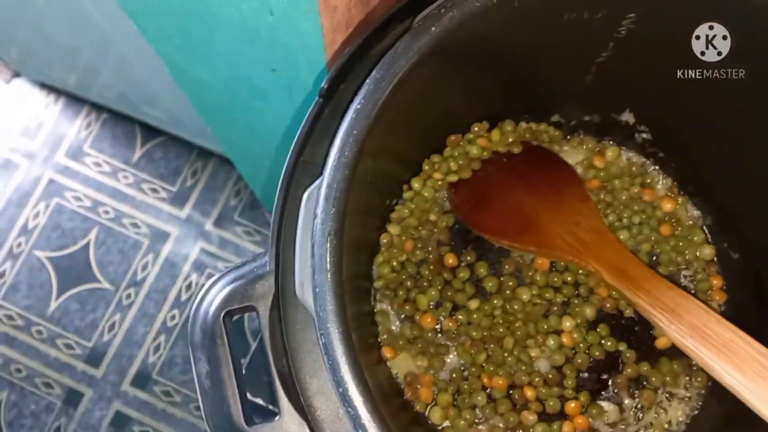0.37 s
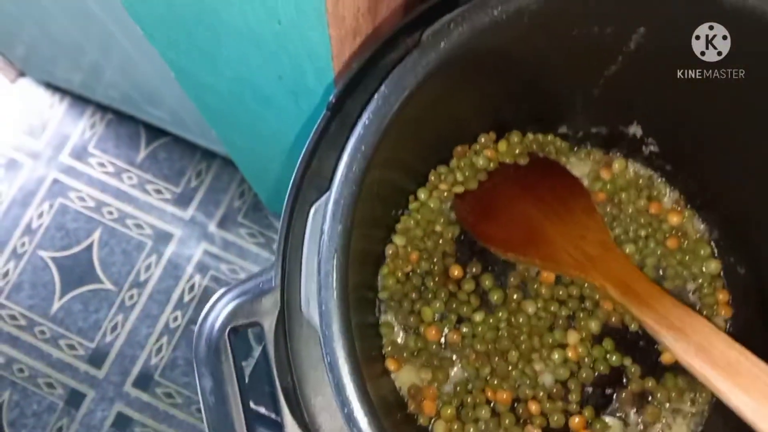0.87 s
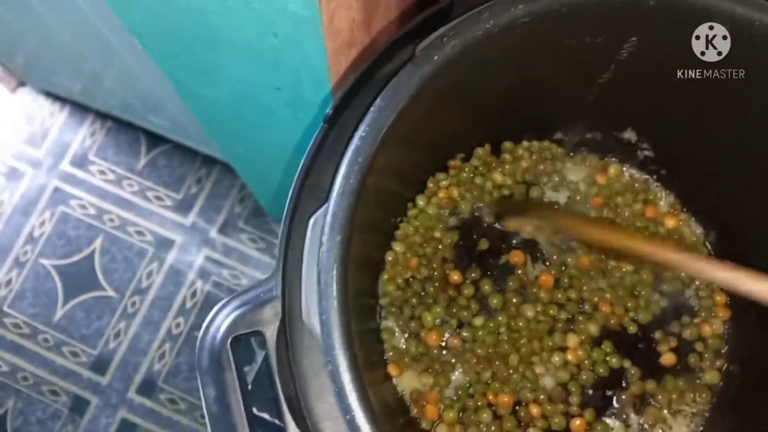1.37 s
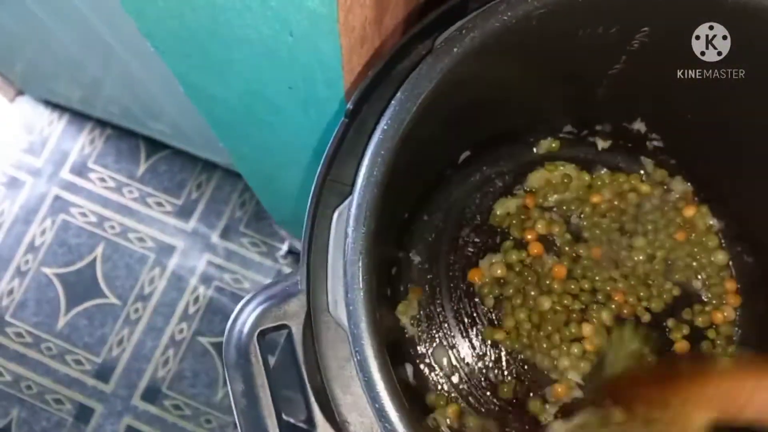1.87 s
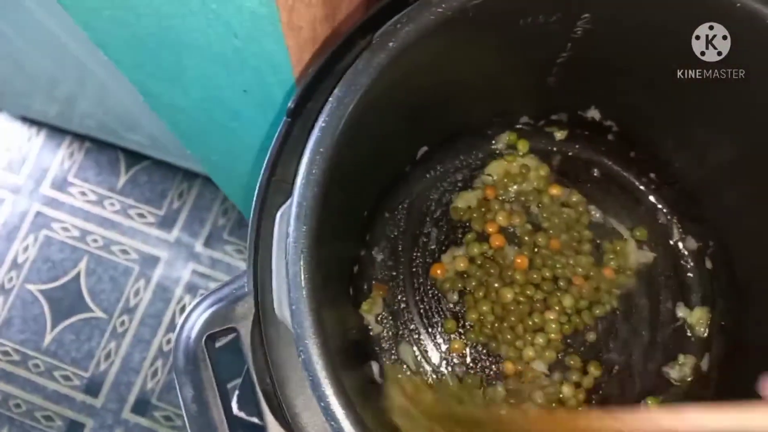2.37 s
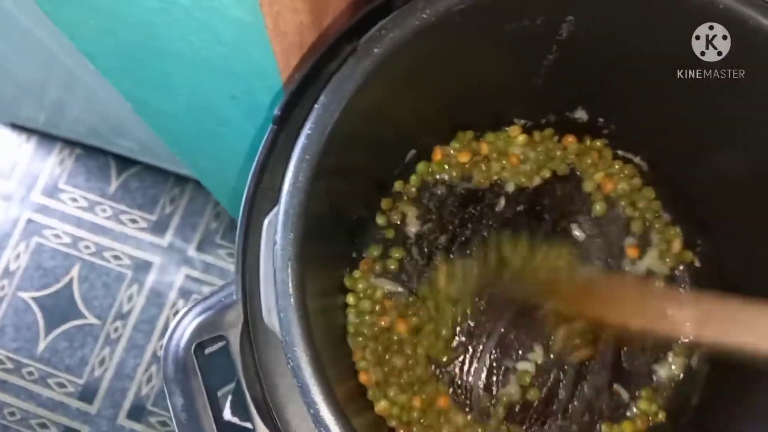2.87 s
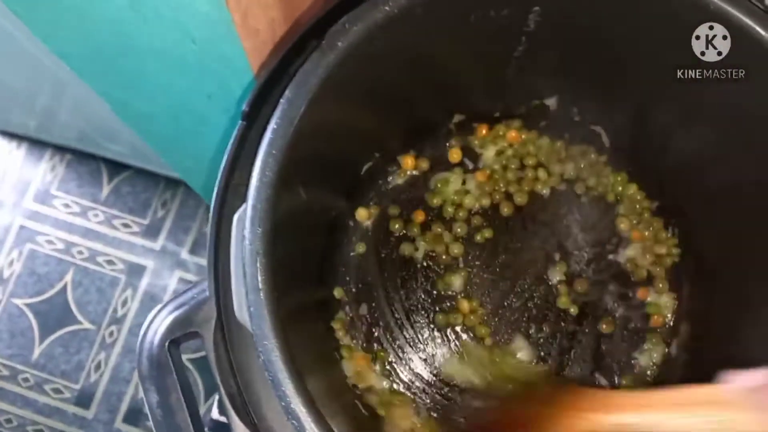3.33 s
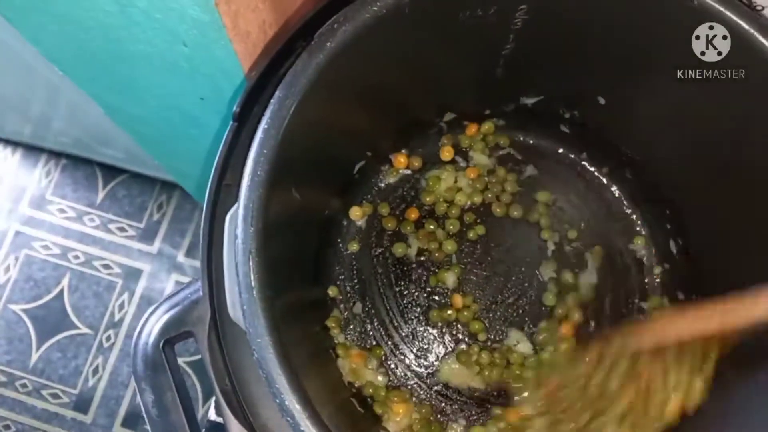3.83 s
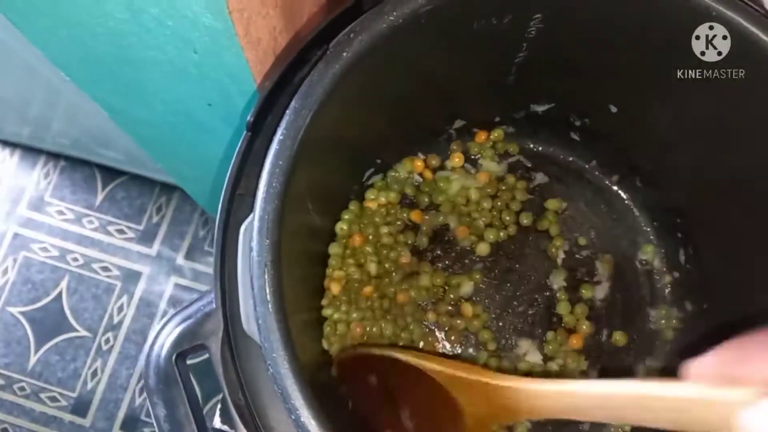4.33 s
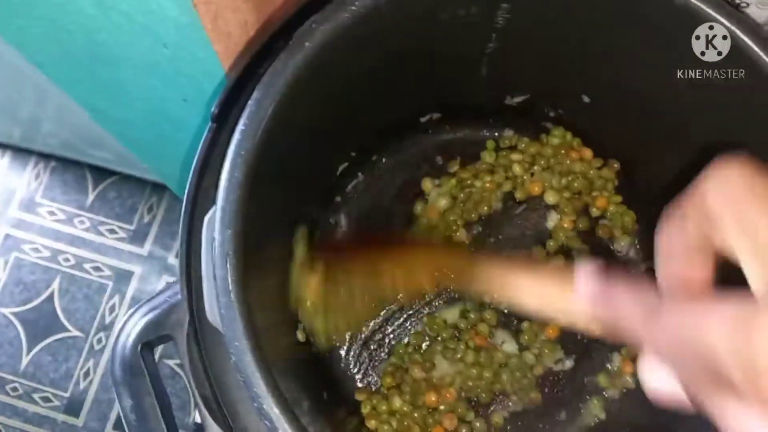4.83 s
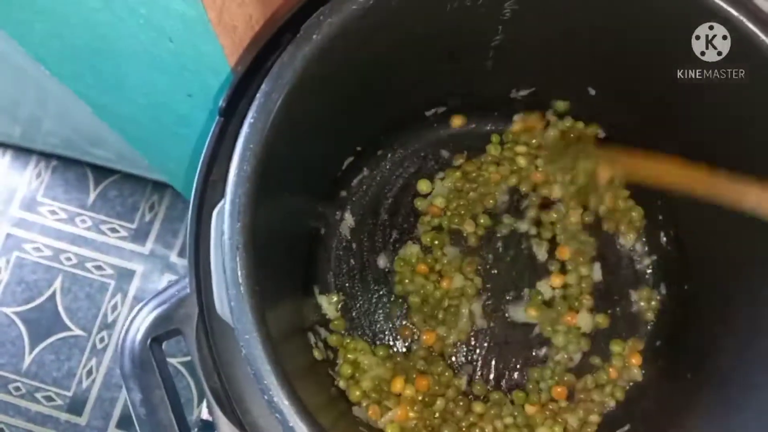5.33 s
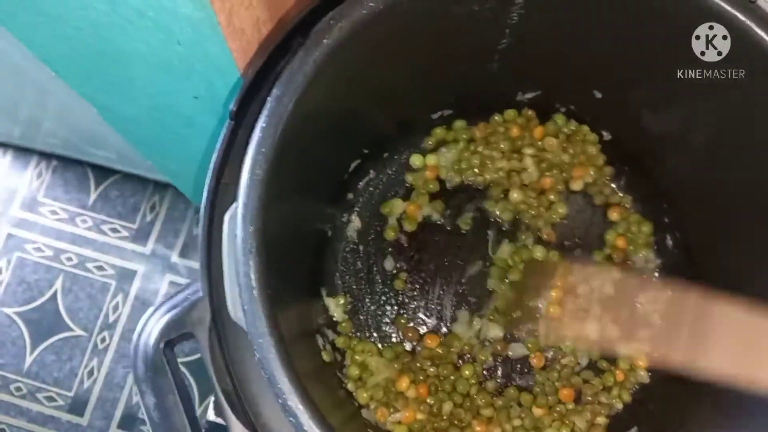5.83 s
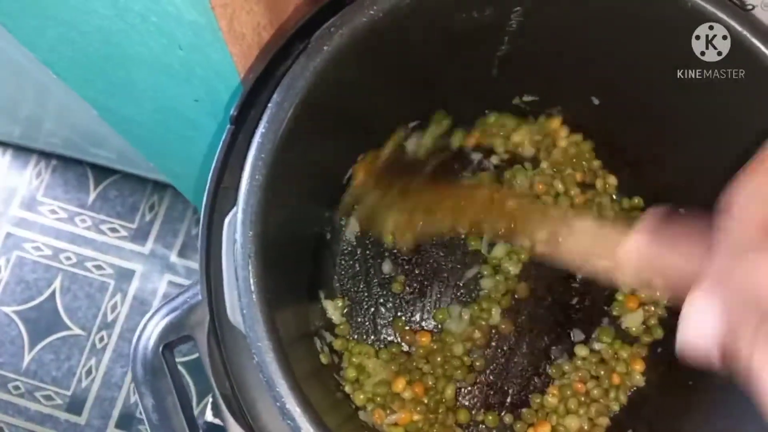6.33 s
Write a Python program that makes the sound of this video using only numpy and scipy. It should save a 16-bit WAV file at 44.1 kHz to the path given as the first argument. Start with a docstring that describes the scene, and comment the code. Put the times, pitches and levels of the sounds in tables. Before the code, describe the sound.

Peas and onion sizzle and crackle steadily in a deep metal pot while a wooden spoon scrapes the floor and knocks the walls.

```python
"""Peas and onion sizzle in fat on the floor of a deep metal pot: showers of tiny pops fizz, crackle and gurgle.
A wooden spoon drags along the floor as noise through the pot's modes, and knocks floor and wall:
low modes boom, upper ones clack under a dry crack, and a small kitchen answers with a noise tail.
A low rumble swells at times, a hum and a deep jolt pass; two microphone ports hear it, the left one louder.
The steady sound steps down a few times, most of all at the hardest knock on the wall."""
import sys
import numpy as np
from scipy import signal
from scipy.fft import rfft, irfft, next_fast_len
from scipy.io import wavfile
from scipy.ndimage import map_coordinates

SR = 44100
rng = np.random.default_rng(int(sys.argv[2]) if len(sys.argv) > 2 else 0)


def invert_db(level):
    """Linear amplitude ratio for a level in decibels (20 dB per decade), elementwise."""
    return 10 ** (np.asarray(level, dtype=float) / 20)


def pcm_store(signal):
    """Save signal as 16-bit PCM."""
    levels = np.round(np.clip(np.atleast_2d(signal), -1, 1) * 32767)
    wavfile.write(sys.argv[1], SR, levels.astype(np.int16).T)


N = 295374  # length in samples


def unit(x):
    """Scales a signal to rms 1."""
    return x / np.sqrt(np.mean(x ** 2) + 1e-20)


def along(points, hz):
    """Reads a curve of (Hz, value) points on a log frequency axis."""
    f, v = np.transpose(points)
    return np.interp(np.log(hz + 1), np.log(f + 1), v)


def curves(rows):
    """Draws one value per sample for each column after the time."""
    s, *cols = np.transpose(rows)
    return [np.interp(np.arange(N) / SR, s, c) for c in cols]


def wobble(rate):
    """A smooth random curve with rate knots a second, 400 at most."""
    knots = rng.standard_normal(int(N * 400 / SR) + 4)
    return map_coordinates(knots, [np.arange(N) * min(rate, 400) / SR])


def filtered(x, response):
    """Multiplies the spectrum of x by a complex response of frequency."""
    m = next_fast_len(N + 8192)
    return irfft(rfft(x, m) * response(np.fft.rfftfreq(m, 1 / SR)), m)[..., :N]


def resonances(modes, hz):
    """Response of (Hz, dB, t60) modes to a steady drive: the shorter the ring, the wider the peak."""
    total = 0
    for center, db, t60 in modes:
        width = np.log(1000) / np.pi / t60
        total = total + invert_db(db) * 1j * hz * width / (center * center - hz * hz + 1j * hz * width)
    return total


# Sudden drops of the steady sound. Each row: time in seconds, change in dB.
STEPS = [(.981, -4), (1.361, -2.5), (2.005, -2), (4.405, -11)]


def steps():
    """Sudden losses of level in dB; a share of each creeps back."""
    return_s, returning_share = 0.45, 0.43
    t = np.arange(N) / SR
    total = 0
    for s, db in STEPS:
        remaining = 1 - returning_share + returning_share * np.exp(-np.abs(t - s) / return_s)
        total = total + db * (t > s) * remaining
    return total


def bubbles(count, scatter_db, lag, spread):
    """Bursting steam bubbles; each lies elsewhere on the floor, so its left-right delay (samples) is its own."""
    place, size, sign, side = rng.random((4, count))
    # many small pops, few big ones
    pops = np.sign(sign - .5) * invert_db(-scatter_db * np.log(size + 8e-4))
    right = place * (N - 64) + 32
    left = right + np.clip(lag + spread * np.sqrt(12) * (side - .5), -30, 30)
    return unit(np.array([np.bincount(at.astype(int), pops, N) for at in (left, right)]))


# Tone colour of the tiny bubbles. Each row: frequency in Hz, relative filter gain in dB.
FIZZ = [(2650, -29), (4500, -11.5), (5750, -7.5), (7000, 0), (7610, -3), (8100, -6), (12400, 0),
        (14900, -2), (15600, -7)]
# Tone colour of the larger bubbles. Each row: frequency in Hz, relative filter gain in dB.
CRACKLE = [(110, -49), (180, -29), (243, -11), (289, -17), (324, -9), (463, -3.5), (634, -19), (786, -22.5),
           (1050, -4.5), (1170, -7), (1560, -1.5), (1910, -2.5), (2170, -1), (3290, 2), (5500, -2.5),
           (7150, 0.5), (12100, -120)]
# Strength of the frying before the steps and flares. Each row: time in seconds, level in dB.
FRYING = [(0, -23.5), (.45, -26), (.79, -25), (.97, -23.8), (1.15, -23), (1.6, -24), (2.0, -22),
          (2.84, -22), (3.11, -20.5), (3.7, -19), (3.92, -22), (4.26, -20.5), (4.58, -19), (5.03, -19),
          (5.23, -18), (5.7, -21), (5.99, -19), (6.22, -20), (6.7, -19.5)]
# Crackle against the frying strength. Each row: time in seconds, level in dB.
CRACKLING = [(0, -8), (.5, -10), (.97, -8), (1.05, -9.5), (1.4, -8), (2.0, -8), (2.8, -7), (3.7, -6.5),
             (4.3, -8.5), (5.0, -8), (6.2, -7), (6.7, -7.5)]
# Gurgle against the frying strength. Each row: time in seconds, level in dB.
GURGLE = [(0, -22.5), (1.8, -20.5), (2.1, -30), (3.0, -19), (3.5, -25), (4.4, -23), (4.7, -51), (5.9, -24),
          (6.7, -47)]


def sizzle():
    """Tiny bubbles fizz and larger ones crackle, flaring together; those under the peas gurgle."""
    frying_db = curves(FRYING)[0] + steps()
    crackle_db = frying_db + curves(CRACKLING)[0]
    gurgle_db = frying_db + curves(GURGLE)[0]
    shared = bubbles(count=40000, scatter_db=2.5, lag=4, spread=3.5)
    tiny = bubbles(count=150000, scatter_db=1.5, lag=3, spread=4)
    large = bubbles(count=40000, scatter_db=2.0, lag=4, spread=2.5)
    buried = bubbles(count=20000, scatter_db=3.5, lag=3.7, spread=2.2)
    diffuse = 0.72 * rng.standard_normal((2, N))  # what the walls scatter differs from port to port
    flare = 0.37 * wobble(35) + 0.57 * wobble(150)
    buried_modes = [(1518, -1.4, 0.0064), (1834, -0.13, 0.028)]  # Hz, dB, t60 s; applied twice over

    fizz = filtered(tiny + 0.3 * shared, lambda hz: invert_db(along(FIZZ, hz)))
    crackle = filtered(large + 0.71 * shared + diffuse, lambda hz: invert_db(along(CRACKLE, hz)))
    gurgle = filtered(buried, lambda hz: resonances(buried_modes, hz) ** 2)

    fizz = unit(fizz) * invert_db(frying_db + 0.94 * flare + 0.44 * wobble(18))
    crackle = unit(crackle) * invert_db(crackle_db + 0.62 * flare + 1.04 * wobble(14))
    gurgle = unit(gurgle) * invert_db(gurgle_db + 0.29 * wobble(12))
    return fizz + crackle + gurgle


# Modes of the pot floor. Each row: frequency in Hz, relative level in dB, free ring time (t60) in seconds.
BOOM = [(258.2, -5.5, 0.17), (290.4, -8, 0.14), (447, 2, 0.05), (481, -28, 0.095), (650, -23, 0.0077),
        (1074, -5, 0.065), (1220, -2, 0.036), (1540, -9, 0.047), (1760, -1.5, 0.02), (2070, -11, 0.017),
        (2200, -18, 0.048)]
# Spoon strokes over the floor. Each row: time of full contact in seconds, length held in seconds,
# level of the deep modes in dB, level of the hollow modes in dB.
SCRAPES = [(1.697, 0.012, -37, -39), (1.804, 0.12, -49.5, -55), (2.15, 0.024, -46, -55),
           (2.21, 0.023, -54, -38), (2.363, 0.18, -47.5, -54), (2.546, 0.025, -42, -44),
           (2.585, 0.08, -37.5, -46), (2.68, .06, -40.5, -50), (2.823, 0.044, -38, -49),
           (2.876, 0.047, -35.5, -43), (3.196, 0.13, -53, -44), (3.336, 0.077, -49, -45),
           (3.695, 0.027, -61, -48), (3.782, 0.044, -50, -39.5), (4, 0.28, -51, -47),
           (4.493, 0.062, -46, -51.5), (4.802, 0.061, -51.5, -53.5), (5.385, 0.088, -51.5, -65),
           (5.712, 0.019, -42, -61), (5.805, 0.033, -48.5, -59), (6.086, 0.016, -35, -44),
           (6.45, 0.19, -56.5, -55)]


def drag():
    """The spoon judders over the floor and drives the lowest modes or the next ones, by where it rubs."""
    bite_s, lift_db_per_s = .012, 240  # a scrape sets in fast and dies as the spoon lifts
    murmur_db = np.array([-60.5, -55])  # deep and hollow modes kept going by the frying, before the steps
    t = np.arange(N) / SR
    power = invert_db(murmur_db[:, None] + steps()) ** 2
    for s, length, *db in SCRAPES:
        bite = np.clip((t - s) / bite_s + 1, 0, 1)
        lift = invert_db(-lift_db_per_s * np.clip(t - s - length, 0, None))
        power = power + (invert_db(db)[:, None] * bite * lift) ** 2

    # mostly common to both ports, partly each port's own
    judder = rng.standard_normal((2, 1, N)) + 0.33 * rng.standard_normal((2, 2, N))
    judder = judder * invert_db(1.3 * wobble(40))
    deep = filtered(judder[0], lambda hz: resonances(BOOM[:2], hz))
    hollow = filtered(judder[1], lambda hz: resonances(BOOM[2:4], hz) + invert_db(3.5) * resonances(BOOM[5:6], hz))
    return unit(deep) * np.sqrt(power[0]) + unit(hollow) * np.sqrt(power[1])


# Modes of the pot wall. Each row: frequency in Hz, relative level in dB, free ring time (t60) in seconds.
CLACK = [(880, -18, 0.12), (1103, -5, 0.11), (1134, -10, 0.2), (1230, -76, 0.0043), (1650, -75, 0.018),
         (1600, -6, 0.065), (1800, 2.5, 0.026), (2056, 2, 0.048), (2214, -16.5, 0.12), (2545, 1, 0.05),
         (2703, 9, 0.025), (3120, 3, 0.026), (3394, -5, 0.024), (3480, 10, 0.0091), (3930, -0.5, 0.023),
         (4420, -3, 0.016), (5370, -4.5, .025), (6030, -2, 0.032), (6950, -0.5, 0.042)]
# Spoon on the wall. Each row: time in seconds, floor level in dB, wall level at 1100 Hz in dB,
# brightness in dB per octave, highest pitch reached in Hz.
KNOCKS = [(1.67, -36, -30, -5, 1200), (1.6934, -14.5, -27.5, 6, 2200), (2.2121, -31, -29, 2, 2200),
          (3.2272, -42, -35.5, 3.5, 4000), (3.627, -40, -20.5, 3.5, 1800), (3.769, -50, -30, 7, 1300),
          (4.4055, -31, -12.5, 0, 7440), (4.796, -39, -25.5, 2, 910), (5.0732, -41.5, -15.5, -10, 2760),
          (5.375, -44, -17, 2.5, 6940)]
# Spoon on the floor. Each row: time in seconds, floor level in dB, highest pitch reached in Hz,
# ring time as a multiple of the modes' own.
THUMPS = [(2.126, -39, 700, .72), (2.158, -31, 700, 0.56), (2.263, -36, 700, .98), (2.361, -32, 700, 1.7),
          (2.547, -35, 1200, 1.9), (2.62, -27.5, 600, 2.4), (2.816, -26.5, 700, 1),
          (2.885, -31.5, 500, 2.6), (4.4949, -29.5, 700, 0.78), (5.714, -26.5, 385, 0.6),
          (5.753, -39, 400, 1.1), (6.082, -29, 1140, 0.83)]


def knocks():
    """Every blow rings floor and wall at new strengths under a dry crack; a harder contact reaches higher."""
    contact_s = .0006  # rise time of a blow
    knock_free = 0.61  # share of the free ring time: the spoon stays pressed on
    thump_wall_db = -20  # the wall under the floor
    out = np.zeros((2, N + SR))
    t = np.arange(SR // 4) / SR
    hz, level_db, t60 = np.transpose(BOOM + CLACK)[..., None]
    is_floor = np.arange(len(hz))[:, None] < len(BOOM)
    grid = np.fft.rfftfreq(len(t), 1 / SR) + 1
    crack_band = 1 / np.sqrt((1 + (1000 / grid) ** 12) * (1 + (grid / 3200) ** 4))

    blows = [(*row, knock_free) for row in KNOCKS]
    blows += [(s, db, db + thump_wall_db, 0, top_hz, free) for s, db, top_hz, free in THUMPS]
    for s, boom_db, clack_db, bright, reach_hz, free in blows:
        reach = lambda f: 1 / np.sqrt(1 + (f / reach_hz) ** 14)
        wall = lambda f: invert_db(clack_db + bright * np.log2(f / 1100))

        luck, skew = rng.standard_normal((2, len(hz), 1))
        skew = skew * .22 * hz / 1000  # the ports hear high modes at different phases
        start = np.where(is_floor, invert_db(boom_db), wall(hz)) * reach(hz) * invert_db(level_db + 1.5 * luck)
        fade = start * invert_db(-60 * t / (t60 * free)) * (1 - np.exp(-t / contact_s))
        ring = [np.sum(fade * np.sin(2 * np.pi * hz * t + side * skew), axis=0) for side in (1, -1)]

        burst = rng.standard_normal(len(t)) + .5 * rng.standard_normal((2, len(t)))
        burst = burst * invert_db(-3 - 60 * t / 0.032)
        crack = irfft(rfft(burst) * wall(grid) * reach(grid) * crack_band, len(t))
        out[:, round(s * SR):][:, :len(t)] += ring + crack

    small = signal.butter(4, 185, 'high', fs=SR, output='sos')  # a small pot sends out no deep bass
    hollow = signal.iirnotch(760, 2.5, SR)  # the air column in the pot cancels between its resonances
    return signal.lfilter(*hollow, signal.sosfilt(small, out[:, :N]))


def jolt():
    """A couple of deep cycles just after the hardest knock, mostly at the left port."""
    center_s, half_s, pitch_hz = 4.424, .013, 60
    t = np.arange(N) / SR - center_s
    left_right = invert_db((-36, -45))[:, None]
    return left_right * np.cos(2 * np.pi * pitch_hz * t) * np.exp(-(t / half_s) ** 2)


def kitchen(blows):
    """The room answers the blows with a short bright noise tail, its own at each port."""
    level_db, t60_s = -13.5, 0.46
    low_hz = 700  # the room returns little of the pot's boom
    t = np.arange(SR // 2) / SR
    tail = rng.standard_normal((2, len(t))) * invert_db(-60 * t / t60_s) * (t > .004)
    tail = invert_db(level_db) * tail / np.linalg.norm(tail[0])
    wet = signal.fftconvolve(blows, tail, axes=1)[:, :N]
    return filtered(wet, lambda hz: 1j * hz / (low_hz + 1j * hz))


def hum():
    """A short hollow hum: noise through one narrow resonance, applied twice, swells for a moment."""
    pitch_hz, start_s, hold_s, level_db = 546, 6.515, 0.071, -45
    rise_db_per_s, fall_db_per_s = 480, 190
    t = np.arange(N) / SR - start_s
    rise = rise_db_per_s * np.minimum(t, 0)
    fall = fall_db_per_s * np.maximum(t - hold_s, 0)
    tone = filtered(rng.standard_normal(N), lambda hz: resonances([(pitch_hz, 0, .07)], hz) ** 2)
    return unit(tone) * invert_db(level_db + rise - fall)


# Tone colour of the steady rumble. Each row: frequency in Hz, relative filter gain in dB.
RUMBLE = [(15, -47), (25, -15.5), (91, 0.5), (118, -5), (146, 6), (167, -11), (220, 2), (290, -19),
          (480, -120)]
# Swells of the rumble. Each row: peak time in seconds, half length in seconds, peak level in dB.
SWELLS = [(.28, 0.13, -62), (1.46, 0.047, -59), (2.56, 0.16, -58), (3.024, 0.21, -56.5),
          (3.454, 0.051, -46.5), (3.89, 0.042, -47.5), (5.443, 0.099, -58), (5.81, 0.094, -55),
          (6.12, 0.065, -60), (6.32, 0.085, -62)]


def rumble():
    """Low noise of stove and kitchen, partly its own at each port, wavering and now and then swelling."""
    start_db, grows_db_per_s = -60, 2.65  # before the steps
    swell_hz, swell_t60_s = 100, 0.035  # one resonance, applied twice, colours the swells
    t = np.arange(N) / SR
    steady = invert_db(start_db + grows_db_per_s * t + steps() + 0.69 * wobble(6.6))
    swells = sum(invert_db(db) * np.exp(-((t - s) / half) ** 2) for s, half, db in SWELLS)
    noise = rng.standard_normal((2, 1, N)) + 0.61 * rng.standard_normal((2, 2, N))
    bed = filtered(noise[0], lambda hz: invert_db(along(RUMBLE, hz)))
    low = filtered(noise[1], lambda hz: resonances([(swell_hz, 0, swell_t60_s)], hz) ** 2)
    return unit(bed) * steady + unit(low) * swells


# Balance of the two ports. Each row: frequency in Hz, gain of left over right in dB.
NEARER = [(30, -5), (70, 5.5), (150, 2), (350, 1.5), (700, 3), (1200, 8.5), (2800, 7.5), (5600, 11),
          (9000, 5), (11000, 8.5), (14000, 12)]


def scene():
    """Mixes all sources and tilts them to the left port, above all in the treble."""
    blows = knocks()
    pot = sizzle() + drag() + blows + jolt() + kitchen(blows) + hum() + rumble()
    return filtered(pot, lambda hz: invert_db(np.outer([.5, -.5], along(NEARER, hz))))


def band_limit(x):
    """A steep low-pass at the top of the band."""
    return signal.sosfilt(signal.butter(12, 16750, fs=SR, output="sos"), x)


def record(dry):
    """Peaks bend softly towards full scale, then everything from 15620 Hz up is cut."""
    clipped = dry / (1 + np.abs(dry) ** 8) ** (1 / 8)
    mix = filtered(clipped, lambda hz: hz < 15620)
    return band_limit(mix)


dry = scene()
out = record(dry)
pcm_store(out)
```